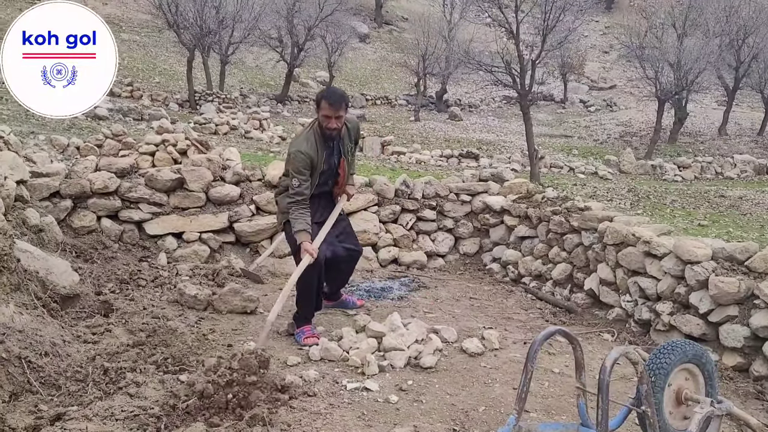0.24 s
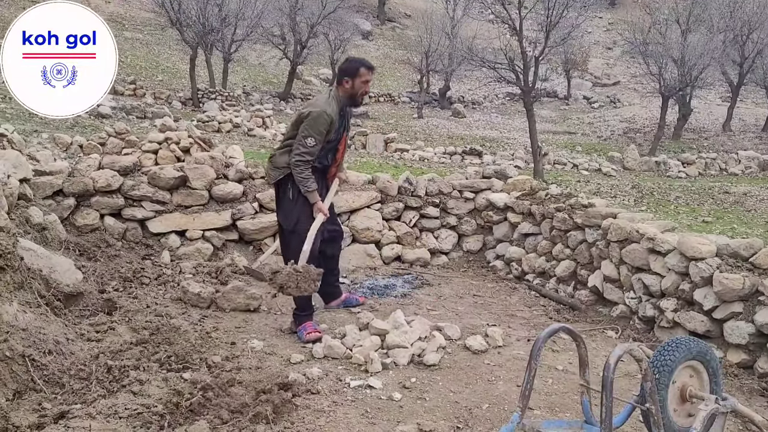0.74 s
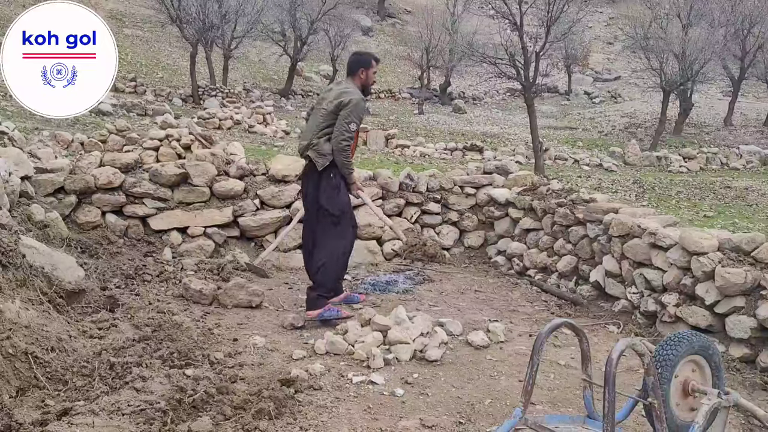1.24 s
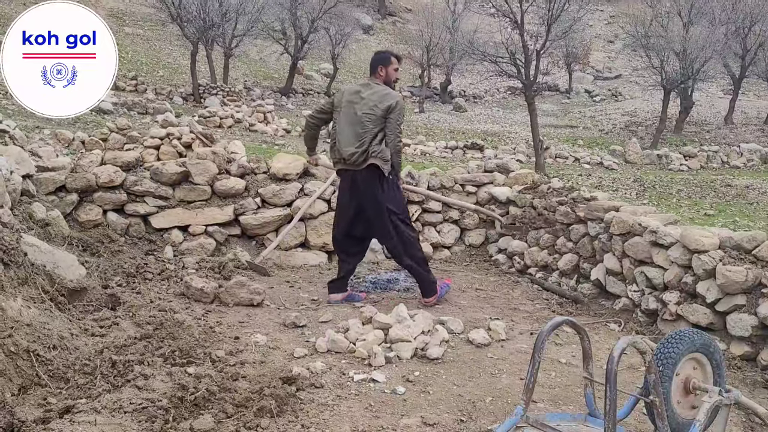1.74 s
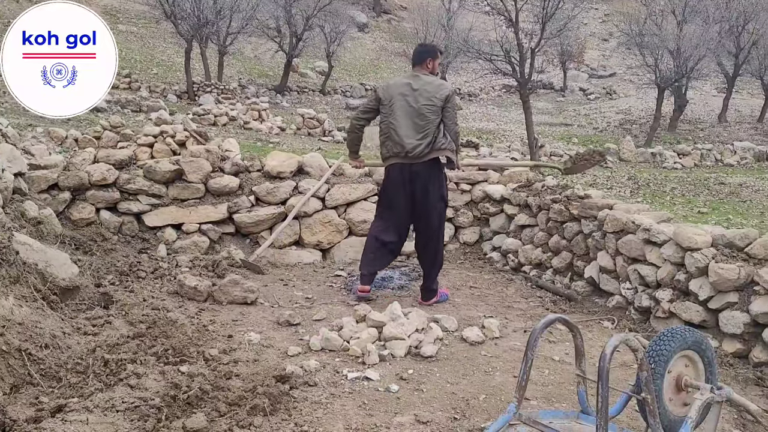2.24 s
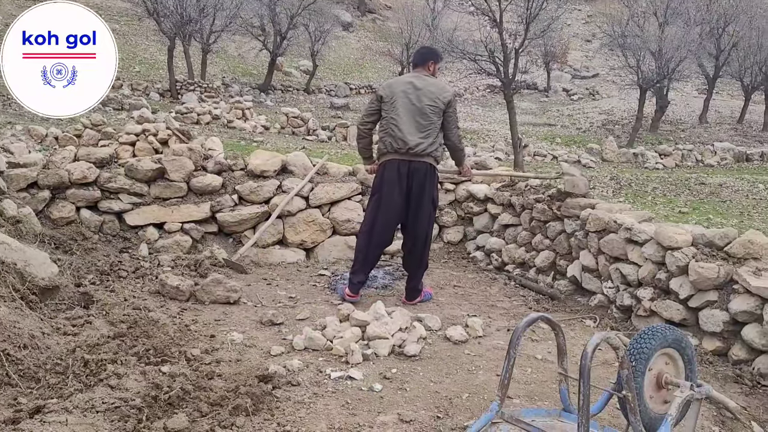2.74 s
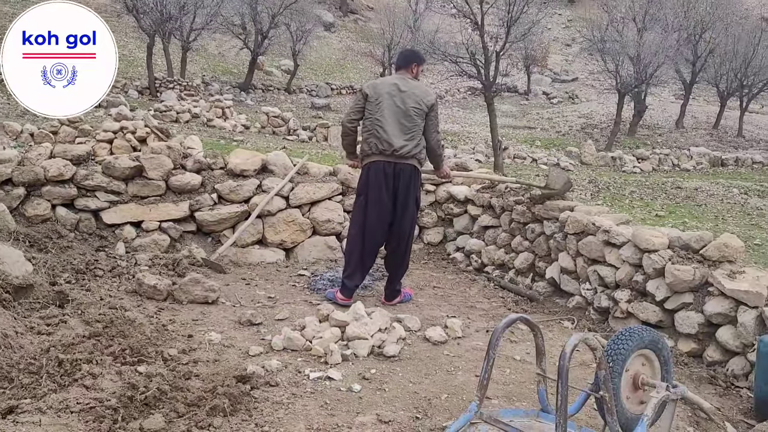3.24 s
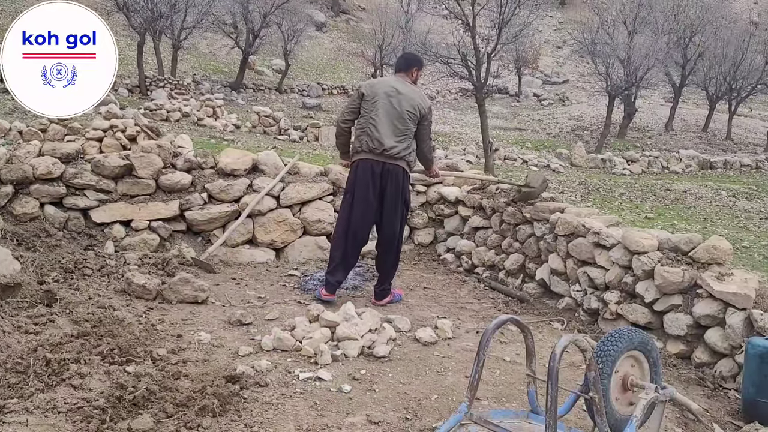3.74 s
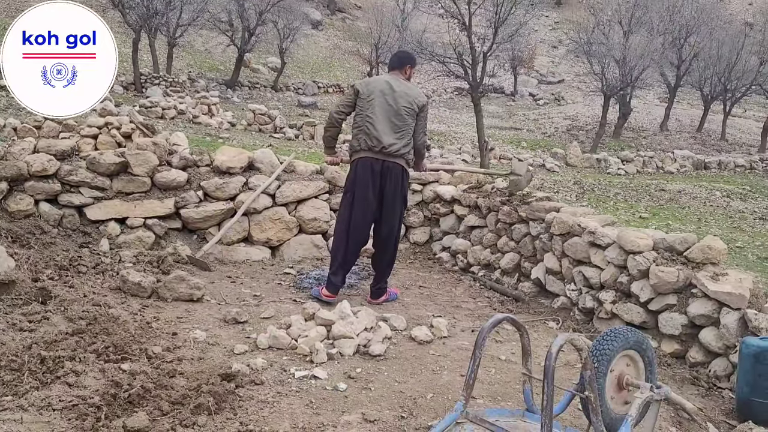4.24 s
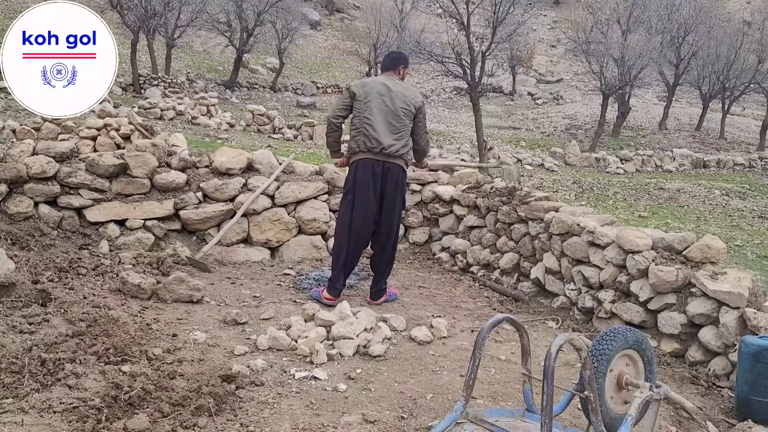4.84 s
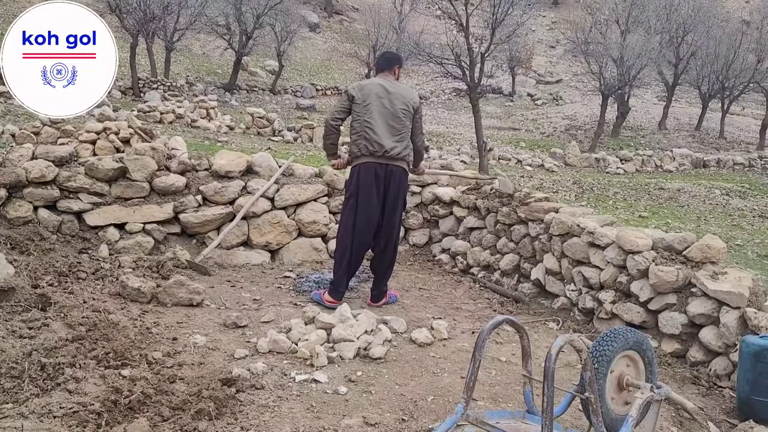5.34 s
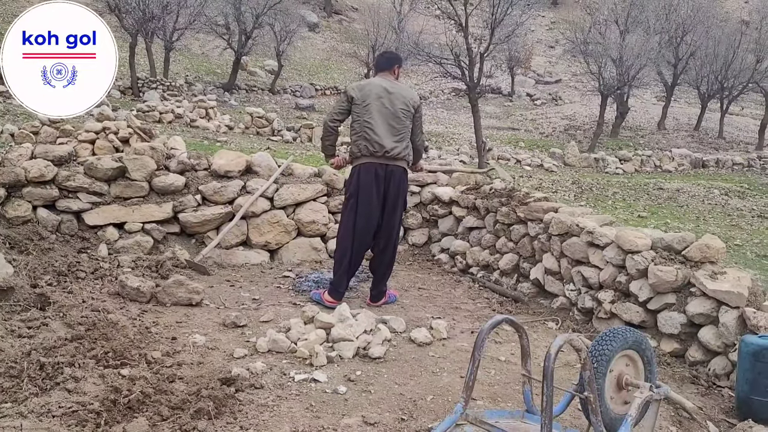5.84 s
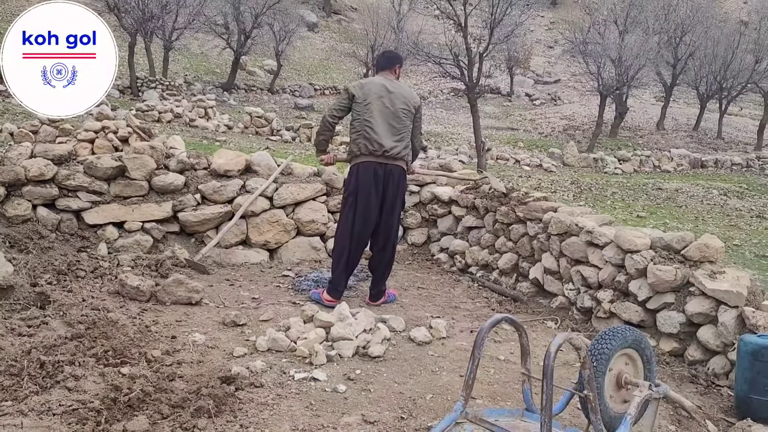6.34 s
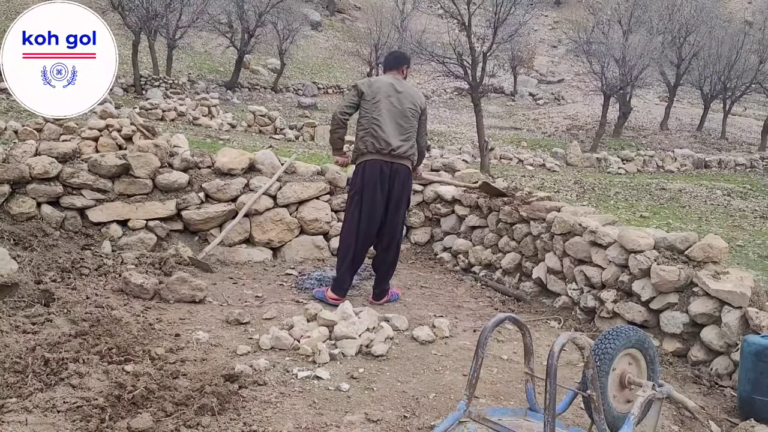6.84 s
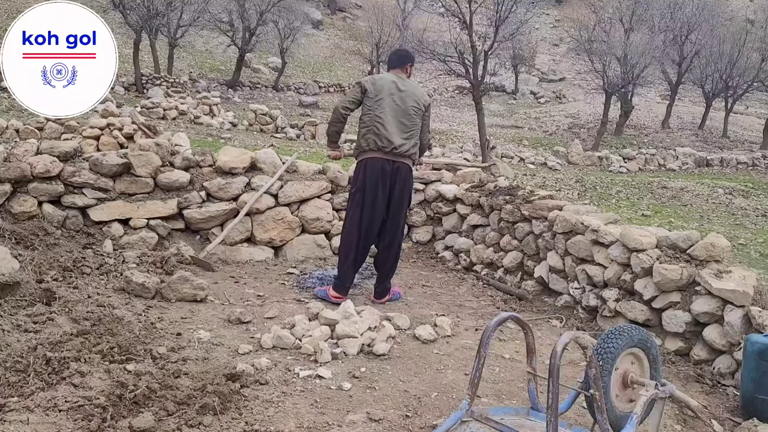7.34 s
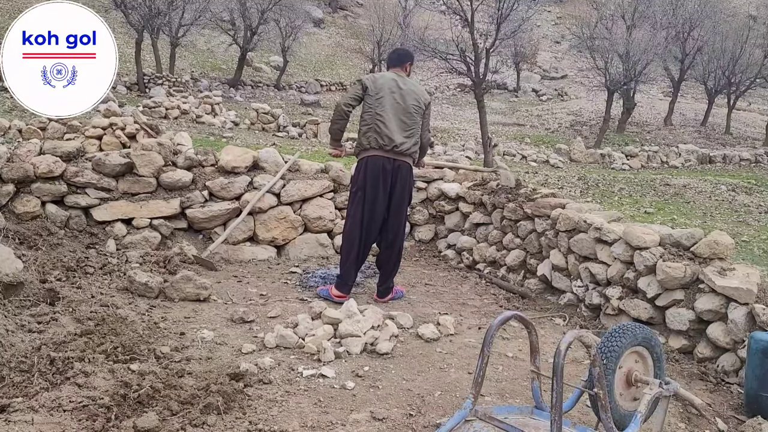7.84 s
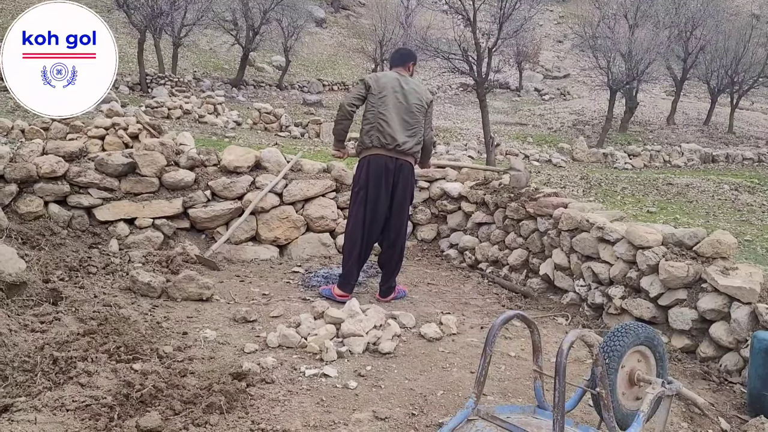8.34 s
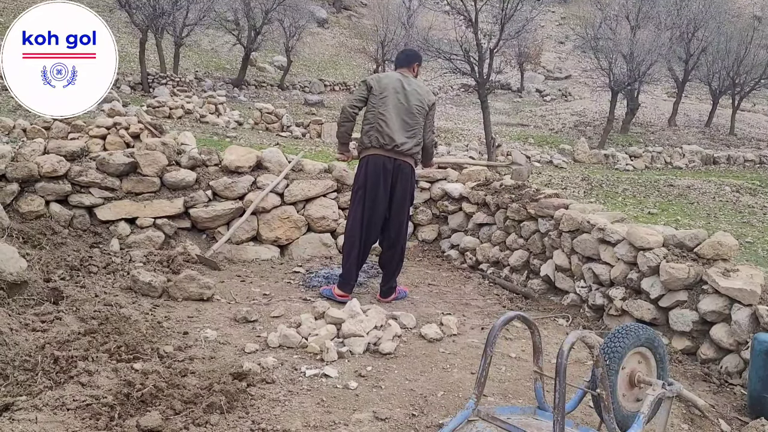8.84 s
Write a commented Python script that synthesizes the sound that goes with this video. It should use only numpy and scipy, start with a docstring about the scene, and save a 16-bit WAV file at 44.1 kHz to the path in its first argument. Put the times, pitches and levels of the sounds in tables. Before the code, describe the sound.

Shovel blade loaded with stony earth lands uneven gritty blows on a dry-stone wall, with ticking pebbles and faint birds in a quiet open valley.

```python
"""In a rough-walled yard on a slope above a valley, a steel shovel lifts stony earth and pats it on a dry-stone wall.
Each blow is crushed grit (noise bands that hold, then decay) plus the damped modes of blade and wooden shaft.
Pebbles tick as short noise bursts; sliding crumbs are grainy noise that grows and runs out.
Behind lie gliding bird calls and faint low tones, far swells and puffs of wind as shaped noise,
and a soft valley hum with one wandering resonance.
The yard adds a thin tail and an echo to the blows, pebbles, bird calls and low tones."""
import sys
import numpy as np
from scipy import signal
from scipy.fft import rfft, irfft
from scipy.io import wavfile

SR = 44100
rng = np.random.default_rng(int(sys.argv[2]) if len(sys.argv) > 2 else 0)


def wav_record(signal):
    """Record a signal, one row per channel, as 16-bit PCM in the file named by sys.argv[1]."""
    frames = np.transpose(np.atleast_2d(signal))
    bounded = np.clip(frames, -1, 1)
    # unit amplitude maps onto the largest positive 16-bit level
    quanta = np.round(bounded * 32767).astype(np.int16)
    wavfile.write(sys.argv[1], SR, quanta)


N = 400428
TIME = np.arange(N) / SR

# shovel blows: [t/s, strength level/dB; relative to it: weight of earth level/dB, scrape of the edge level/dB,
# crushed grit level/dB; time the earth takes to give way t/s, free ring of the blade level/dB,
# spilling crumbs level/dB (both relative to the crunch), pitch favoured by the point of contact f/Hz]
BLOWS = [(2.6326, -28.5, -11, -13, -16, 0.0075, -8, -9, 925),
         (3.4512, -35.5, -16.5, -11, -9.5, 0.014, -17, -19.5, 2900),
         (3.474, -49.5, -4, -3, -4, 0.0031, -2.5, -23, 2369),
         (3.5037, -50.5, -10, -5.5, -12, 0.013, -5, -7, 2600),
         (4.5461, -41.5, -6, -11, -6, 0.0086, -11, -15, 2350),
         (5.171, -21, -7, -1.5, -8, 0.0052, -5.5, -23, 1100),
         (5.683, -47.5, -2, -8.5, -7.5, 0.021, -11.5, -15, 475.9),
         (6.115, -60, -2.5, -10, -7, .014, -15, -10, 920),
         (6.805, -33.5, -0.5, -10.5, -9.5, 0.015, -10.5, -28, 763),
         (7.5071, -44.5, -5, -7, -9, .0072, -10.5, -33, 2190),
         (7.5696, -47, 0, -3.5, -3, 0.011, -8, -33, 257.2),
         (8.358, -73, 10.5, -17, -24, .003, -8.5, -29.5, 590),
         (8.4812, -17.5, -9, -17.5, -15.5, 0.012, -8, -33, 2060)]
# voices of a blow (ground thump, shaft thud, body, knock, clank, scrape, grit):
# [trim level/dB, 60 dB decay of the crunch t/s, share of the give time that it lasts]
BLOW_VOICES = [(-19, 0.074, 0.97), (-0.6, 0.26, 0.95), (-0.1, .085, 0.91), (-3, 0.087, 1), (-3.5, .075, .9),
               (-1, 0.066, 0.52), (-7.5, .065, .4)]
# frequency band of each of those voices: [lowest f/Hz, highest f/Hz]
BLOW_BANDS = [(35, 110), (175, 350), (350, 620), (620, 1350), (1350, 3200), (3200, 7000), (7000, 18000)]
# vibration modes of blade and shaft: [f/Hz, level/dB]
SHOVEL_MODES = [(226, 1), (266, 0), (315, -4), (418, 4), (530, -3), (619, -6), (775, -3), (822, -4),
                (936, 3), (1040, -4), (1115, -4), (1174, -1), (1456, -6), (1564, -7), (1714, 1), (1770, -5),
                (1878, -7), (1993, -2), (2157, 4), (2300, -6), (2432, 2), (2562, -1), (2700, -9),
                (3052, -6), (3330, -14), (3525, -7), (4168, -5), (4400, -7), (5850, -9), (6590, -7),
                (7310, -8)]
RING_T60_S = .078
CONTACT_DB, CONTACT_OCTAVES = 5.5, 0.54   # lift of the voices near the favoured pitch, and its reach

# small stones and crumbs landing: [t/s, knock of the stone level/dB, its grit level/dB, time spent crumbling t/s]
PEBBLES = [(.289, -70.5, -82, .002), (.551, -78, -72, .002), (.575, -69, -72, 0.00568),
           (1.226, -61.5, -80, 0.00317), (1.24, -84, -72, .002), (1.686, -64.5, -80.5, 0.0018),
           (1.936, -90, -77.5, .002), (2.174, -76, -71.5, 0.0018), (2.398, -76.5, -74.5, .002),
           (2.485, -77, -68.5, .002), (2.607, -63, -69.5, .002), (3.043, -63, -74.5, .002),
           (3.087, -73, -79, 0.0016), (3.1365, -55, -100, 0.0018), (3.67, -81.5, -76, .002),
           (3.703, -60.5, -66, 0.002747), (3.7305, -77, -62.5, .0015), (6.095, -78, -78, .019),
           (8.05, -81, -81, 0.045), (8.934, -74, -80.5, 0.015)]
# voices of a pebble (tap, knock, click, hiss): [trim level/dB, share that follows the grit rather than the knock]
PEBBLE_VOICES = [(4, 0.18), (-1, 0.17), (-3.5, 0.65), (-1, 1)]
# successive limits of the four pebble bands: [f/Hz]
PEBBLE_EDGES = [400, 1100, 2000, 6000, 16500]
PEBBLE_T60_S = 0.059

# loads of loose earth sliding on the blade:
# [fastest flow t/s, build-up t/s, die-away t/s, coarse crumbs level/dB, fine soil level/dB]
SLIDES = [(.32, 0.11, 0.27, -85, -83), (.59, 0.075, 0.12, -76, -72.5), (1.17, .07, 0.089, -82.5, -87.5),
          (1.83, 0.1249, 0.28, -83, -83.5), (2.46, 0.079, .11, -81.5, -75.5),
          (3.26, 0.12, 0.15, -79.5, -79.5), (3.44, 0.11, 0.14, -72.5, -78), (3.53, .015, 0.03, -60, -66),
          (3.73, .04, 0.053, -72, -74), (4.35, .08, .1, -87.5, -84.5), (4.62, 0.1, 0.03488, -71.5, -74.5),
          (5.28, 0.04152, 0.26, -80, -82.5), (5.64, .05, 0.087, -80, -84), (6.85, 0.019, 0.052, -80, -77),
          (8.56, 0.039, 0.04, -66, -76)]
SCRATCH_DB = -10   # scratch of a slide, relative to the mean of its crumbs and soil
# noise spectra of the coarse crumbs, the scratch and the fine soil: [f/Hz, relative level per Hz/dB]
RASP_SPECTRUM = [(1400, -17.5), (2100, 5.5), (2500, 0.5), (3100, -5), (3500, -7.5), (4500, -25)]
SCRATCH_SPECTRUM = [(2500, -18), (3700, -1), (4500, 0), (5600, -2), (7000, -20.5)]
HISS_SPECTRUM = [(3500, -33), (5500, -4.5), (7000, 3), (9500, -4.5), (12500, 1.5), (16000, -2.5)]

# the two microphone ports: [f/Hz, left lead/rad, left minus right level/dB]
PORTS = [(100, 0, -.8), (500, -.25, -2.5), (850, -.35, 1), (1300, -1.2, -3.5), (2400, -1.2, -2.5),
         (3500, -.9, -2), (5500, -1.4, 5), (6500, -3.8, 4), (7500, -5.6, 1), (10000, -6.6, 4),
         (12500, -7.8, -4), (16000, -8, 0)]
# how alike far sound is at left and right: [f/Hz, likeness]
LIKENESS = [(30, .3), (80, 0.8), (160, .93), (400, 0.26), (900, 0.59), (1500, 0.019), (16000, 0.12)]
ECHO_S = .071

# shapes of far bird calls (rising chirp, level pip, slow rising slur, falling scold, thin high tsip):
# [length t/s, first f/Hz, last f/Hz, waver as a share of f]
CHIRP = (.048, 3550, 4200, .1)
PIP = (.085, 3580, 3595, .002)
SLUR = (.28, 2530, 3260, 0.0037)
SCOLD = (.058, 3600, 2500, 0.17)
TSIP = (.04, 6100, 6300, 0.042)
# when each call is heard: [t/s, level before trim/dB]
CHIRP_CALLS = [(.19, -80), (.31, -73), (1.1, -84), (1.78, -72), (4.16, -75.5), (4.31, -74.5), (4.44, -81)]
PIP_CALLS = [(1.52, -83), (2.0, -88), (2.465, -76), (4.18, -85.5), (4.67, -85.5)]
SLUR_CALLS = [(3.82, -81), (4.37, -85), (5.3, -81)]
SCOLD_CALLS = [(1.47, -66.5), (3.76, -66)]
TSIP_CALLS = [(1.47, -78), (2.09, -76), (2.35, -77)]
# faint low tones that slide down:
# [t/s, length t/s, first f/Hz, last f/Hz, level before trim/dB, waver as a share of f]
LOW_TONES = [(.545, 0.06, 356, 304, -46, 0.01), (5.26, .22, 405, 252.3, -47.5, .01)]

# far sounds that swell and fade: [t/s, half length t/s, level/dB, lowest f/Hz, highest f/Hz]
SWELLS = [(0.796, 0.34, -76, 1300, 1680), (1.723, .17, -74.5, 1397, 1720), (3.677, .04, -61, 583, 663),
          (4.403, 0.047, -63.5, 536, 617), (4.77, 0.046, -67, 602, 703), (8.92, 0.16, -72, 1640, 2450)]
# puffs of wind on the microphone: [t/s, half length t/s, level/dB, left minus right level/dB]
WIND = [(0.79, 0.018, -61, 10), (0.893, 0.035, -53, 18), (0.96, 0.02664, -64, 8), (1.579, 0.035, -57, 8.5),
        (2.063, 0.0338, -56, 12), (2.56, 0.026, -57.5, -1), (2.665, 0.039, -55, -1.5),
        (7.254, 0.11, -61.5, -17), (7.712, 0.02438, -46, -17), (7.813, 0.038, -44.5, -14),
        (7.92, 0.021, -52.5, -12)]
# noise spectrum of a puff: [f/Hz, relative level per Hz/dB]
PUFF_SPECTRUM = [(20, -15.5), (45, 0), (65, 1), (100, -12.5), (160, -15), (300, -35)]

# the valley: [t/s, hum level before trim/dB, narrow resonance level/dB]
VALLEY = [(0.0, -62, -66.5), (0.7, -59, -68), (1.59, -62, -78.5), (2.27, -61.5, -70.5), (2.98, -62.5, -83),
          (3.29, -62, -69.5), (3.59, -59, -69.5), (4.05, -63.5, -78.5), (4.37, -59.5, -72.5),
          (5.06, -60, -77), (5.28, -59, -71), (5.59, -62, -74), (6.7, -62, -72.5), (7.46, -61.5, -77),
          (7.74, -60, -65), (7.96, -62.5, -72), (8.9, -61.5, -81.5), (9.08, -60.5, -78)]
# pitch of the narrow upper resonance of the hum: [t/s, f/Hz]
HUM_PEAK = [(0, 995.6), (2.5, 1014), (3.5, 1064), (4.5, 1085), (5.5, 1045), (7, 1058), (9.08, 1021)]
# noise spectra of the hum, the airy edge above it and the faint hiss: [f/Hz, relative level per Hz/dB]
HUM_SPECTRUM = [(15, -50.5), (25, -20.5), (48, -9.5), (97, -6.5), (213, -1.5), (321, -1), (356, -3.5),
                (694, -16), (913, -17.5), (994, -11.5), (1240, -33), (1500, -35.5), (1950, -64),
                (3300, -120)]
EDGE_SPECTRUM = [(900, -20.5), (1250, 0.5), (1580, 0), (1950, -7.5), (2600, -12.5)]
AIR_SPECTRUM = [(1500, -6.5), (2200, 4), (3200, -.5), (4500, -2), (7000, -3.5), (10000, -2.5), (13000, -1),
                (16000, -1.5)]
EDGE_DB, AIR_DB = -85.5, -87   # steady levels of the airy edge and the hiss

CUTOFF_HZ = 16100


def blows(crack_db=6.0, crack_s=0.0015, rise_s=0.0004, spill_t60=0.057, clump_db=2.5):
    """Impact excitation: a crack on stone, crushed earth and ringing modes, with crumbs spilling in clumps."""
    out = np.zeros((2, N))
    t = np.arange(SR // 4) / SR
    onset = 1 - np.exp(-t / rise_s)
    crack = 1 + from_db(crack_db) * np.exp(-t / crack_s)
    for s, strength_db, weight_db, scrape_db, grit_db, give_s, ring_db, spill_db, favoured_hz in BLOWS:
        levels = strength_db + voice_levels(weight_db, scrape_db, grit_db, favoured_hz)
        ring = from_db(ring_db) * shovel_ring(t, give_s, favoured_hz)
        clumps = from_db(spill_db + clump_db * drift(150, size=len(t)))
        spill = clumps * crunch(t, give_s, spill_t60, grain_db=5.5)
        for level_db, (low_hz, high_hz), (trim_db, t60, share) in zip(levels, BLOW_BANDS, BLOW_VOICES):
            crushed = crack * crunch(t, share * give_s, t60) + spill
            contact = onset * (ring + struck_stone(crushed, favoured_hz))
            add(out, s, voiced(contact, low_hz, high_hz, level_db + trim_db))
    return out


def voice_levels(weight_db, scrape_db, grit_db, favoured_hz):
    """Spectral balance: earth feeds three low voices, edge and grit the top two; contact lifts its own pitch."""
    centre_hz = np.sqrt(np.prod(BLOW_BANDS, axis=1))
    lift_db = CONTACT_DB * np.exp(-(np.log2(centre_hz / favoured_hz) / CONTACT_OCTAVES) ** 2)
    return lift_db + np.array([weight_db, weight_db, weight_db, 0, 0, scrape_db, grit_db])


def shovel_ring(t, give_s, favoured_hz, favour_db=8.0, reach_octaves=0.55, scatter_db=2.5):
    """Modal excitation: the point of contact brings out modes near one pitch; earth damps them all alike."""
    hz, level_db = np.transpose(SHOVEL_MODES)[:, :, None]
    strength, phase_turns = rng.standard_normal((2, len(SHOVEL_MODES), 1))
    favour = np.exp(-(np.log2(hz / favoured_hz) / reach_octaves) ** 2)
    level_db = level_db + scatter_db * strength + favour_db * favour
    modes = from_db(level_db) * np.sin(2 * np.pi * (hz * t + phase_turns))
    damping_db = -60 * np.maximum(t - give_s / 2, 0) / RING_T60_S
    return modes.sum(axis=0) * from_db(damping_db)


def crunch(t, give_s, t60, grain_db=1.0, spread=0.39):
    """Fracture noise: grit breaks in dense uneven snaps while the earth gives way, then dies out."""
    # one part common to both ports, one part independent at each
    snaps = rng.standard_normal(len(t)) + spread * rng.standard_normal((2, len(t)))
    decay_db = -60 * np.maximum(t - give_s, 0) / t60
    return snaps * from_db(grain_db * drift(1800, size=len(t)) + decay_db)


def struck_stone(x, stone_hz, stone_db=4.5, half_width_octaves=.17):
    """Damped resonance: the stone under the blade adds one broad, dead resonance to the crunch."""
    width = 2 ** half_width_octaves
    return x + from_db(stone_db) * band(x, stone_hz / width, stone_hz * width, order=1)


def pebbles():
    """Small impacts: stones tick without ringing the blade, a knock below and grit above."""
    out = np.zeros((2, N))
    t = np.arange(SR // 8) / SR
    for s, knock_db, grit_db, give_s in PEBBLES:
        for (trim_db, share), low_hz, high_hz in zip(PEBBLE_VOICES, PEBBLE_EDGES, PEBBLE_EDGES[1:]):
            level_db = trim_db + knock_db + share * (grit_db - knock_db)
            add(out, s, voiced(crunch(t, give_s, PEBBLE_T60_S), low_hz, high_hz, level_db))
    return out


def voiced(x, low_hz, high_hz, level_db):
    """Band-limited radiation: one band of a contact, with this level over its first 20 ms."""
    x = band(at_ports(x), low_hz, high_hz)
    return from_db(level_db) * x / rms(x.mean(axis=0)[:SR // 50])


def at_ports(x):
    """Interaural-like difference: sound reaches the two ports with a lag and a shadow that depend on pitch."""
    size = x.shape[-1]
    hz = np.arange(size + 1) * SR / (2 * size)
    # half of the difference goes to the left, its inverse to the right
    half = np.exp(.5j * at_hz(PORTS, hz)) * from_db(at_hz(PORTS, hz, axis=2) / 2)
    return irfft(rfft(x, 2 * size) * np.array([half, 1 / half]))[:, :size]


def sliding_earth(grain_db=3.5, clump_db=1.95):
    """Friction noise: crumbs rub over steel and stone in small clumps; each slide gathers pace and runs out."""
    rasp = scratch = hiss = 0
    for s, build_s, die_s, coarse_db, fine_db in SLIDES:
        steepness = np.maximum((s - TIME) / build_s, (TIME - s) / die_s)
        flow = np.exp(-np.minimum(steepness, 20))
        scratch_db = (coarse_db + fine_db) / 2 + SCRATCH_DB
        # overlapping slides add in power
        rasp = np.hypot(rasp, flow * from_db(coarse_db))
        scratch = np.hypot(scratch, flow * from_db(scratch_db))
        hiss = np.hypot(hiss, flow * from_db(fine_db))
    grains = from_db(grain_db * drift(830) + clump_db * drift(34))
    crumbs = rasp * air_noise(RASP_SPECTRUM)
    scratches = scratch * air_noise(SCRATCH_SPECTRUM)
    soil = hiss * air_noise(HISS_SPECTRUM)
    return grains * (crumbs + scratches + soil)


def yard(x, tail_db=-32.5, t60=0.48, treble_t60=0.44, treble_db=0.0, echo_db=-38.0, echo_spread_s=0.0053):
    """Scattering: rough walls and the slope return a thin, blurred tail and one smeared echo."""
    t = np.arange(SR) / SR
    low, high, slap = rng.standard_normal((3, 2, SR))
    low_tail = band(low, 200, 4000, order=2) * from_db(-60 * t / t60)
    treble_tail = band(high, 4000, 9000, order=2) * from_db(treble_db - 60 * t / treble_t60)
    tail = low_tail + treble_tail
    echo = band(slap, 600, 8700, order=1) * (t > ECHO_S) * np.exp(-np.abs(t - ECHO_S) / echo_spread_s)
    response = from_db(tail_db) * tail / rms(tail) + from_db(echo_db) * echo / rms(echo)
    response = response / np.sqrt(SR)
    # a random modulation blurs the ringing lines, so that the tail is rough rather than tonal
    blurred = x * np.sqrt(2) * np.sin(2.2 * drift(650))
    return x + signal.fftconvolve(blurred, response, axes=1)[:, :N]


def birds():
    """Frequency-modulated whistles: each kind of call repeats with the same glide, louder or softer."""
    kinds = [(CHIRP, CHIRP_CALLS), (PIP, PIP_CALLS), (SLUR, SLUR_CALLS), (SCOLD, SCOLD_CALLS),
             (TSIP, TSIP_CALLS)]
    notes = []
    for (length_s, first_hz, last_hz, waver), calls in kinds:
        for s, level_db in calls:
            notes.append((s, length_s, first_hz, last_hz, level_db, waver))
    return whistles(notes, trim_db=-3.5, waver_rate=1000, flutter_db=5.0)


def low_tones():
    """Gliding tones: faint low notes slide down with a slower waver than the birds."""
    return whistles(LOW_TONES, trim_db=2.0, waver_rate=52, flutter_db=3.5)


def whistles(notes, trim_db, waver_rate, flutter_db):
    """Phase integration: near-pure notes glide fast, then level off; distance makes them flutter."""
    out = np.zeros((2, N))
    for s, length_s, first_hz, last_hz, level_db, waver in notes:
        u = np.linspace(0, 1, int(length_s * SR))
        glide_hz = last_hz + (first_hz - last_hz) * (1 - u) ** 2
        hz = glide_hz * (1 + waver * drift(waver_rate, size=len(u)))
        flutter = flutter_db * drift(110, size=len(u))
        gain = from_db(level_db + trim_db + flutter) * np.sin(np.pi * u)
        add(out, s, gain * np.sin(2 * np.pi * np.cumsum(hz) / SR))
    return out


def far_swells():
    """Amplitude envelopes: narrow bands of far sound come and go."""
    out = np.zeros((2, N))
    air = air_noise(EDGE_SPECTRUM)
    for s, half_s, level_db, low_hz, high_hz in SWELLS:
        sound = band(air, low_hz, high_hz, order=2)
        out += from_db(level_db) * swell(s, half_s) * sound / rms(sound.mean(axis=0))
    return out


def wind():
    """Turbulent pressure noise: low puffs swell and fade, each stronger on one port."""
    gain = np.zeros((2, N))
    for s, half_s, level_db, pan_db in WIND:
        port_db = level_db + np.array([[pan_db], [-pan_db]]) / 2
        gain += from_db(port_db) * swell(s, half_s)
    return gain * air_noise(PUFF_SPECTRUM)


def valley(hum_trim_db=2.0, width_hz=45, waver_db=1.5):
    """Filtered noise: a far, even hum and a narrow resonance that wanders and wavers, under a faint hiss."""
    hum_db, peak_db = in_time(VALLEY)
    centre_hz, = in_time(HUM_PEAK)
    # slow noise multiplied by a sine gives a narrow band around the sine
    wobble = air_noise([(1, 0), (width_hz, -3), (4 * width_hz, -20)])
    peak = np.sqrt(2) * wobble * np.sin(2 * np.pi * np.cumsum(centre_hz) / SR)
    resonance = from_db(peak_db + waver_db * drift(4.3)) * peak
    hum = from_db(hum_db + hum_trim_db) * air_noise(HUM_SPECTRUM)
    air = from_db(EDGE_DB) * air_noise(EDGE_SPECTRUM) + from_db(AIR_DB) * air_noise(AIR_SPECTRUM)
    return hum + resonance + air


def air_noise(spectrum):
    """Partial coherence: diffuse stereo noise of this spectrum, whose left-right mean has rms 1."""
    hz = np.arange(N // 2 + 1) * SR / N
    # the spectrum falls away above its last point
    gain = from_db(at_hz(spectrum, hz)) / (1 + (hz / spectrum[-1][0] / 1.2) ** 12)
    alike = np.clip(at_hz(LIKENESS, hz), -1, 1)
    mid_side = rfft(rng.standard_normal((2, N))) * gain * np.sqrt([1 + alike, 1 - alike])
    mid, side = irfft(mid_side, N)
    return np.array([mid + side, mid - side]) / rms(mid)


def swell(s, half_s):
    """Envelope: a flat-topped rise and fall around time s, at half height half_s away."""
    return 1 / (1 + ((TIME - s) / half_s) ** 4)


def drift(rate, size=N):
    """Random modulation: straight lines between normal random values, this many values a second."""
    return np.interp(np.arange(size) / SR * min(rate, SR / 2), np.arange(size), rng.standard_normal(size))


def band(x, low_hz, high_hz, order=4):
    """Linear filtering: a causal Butterworth band-pass."""
    edges_hz = [low_hz, min(high_hz, SR / 2 - 1000)]
    return signal.sosfilt(signal.butter(order, edges_hz, "band", fs=SR, output="sos"), x)


def from_db(db):
    """Logarithmic level: decibels to amplitude gain."""
    return 10 ** (np.asarray(db) / 20)


def rms(x):
    """Effective value: root mean square, kept above zero."""
    return np.sqrt(np.mean(x ** 2) + 1e-20)


def in_time(rows):
    """Linear interpolation: each column of a time table at every sample."""
    s, *columns = np.transpose(rows)
    return [np.interp(TIME, s, column) for column in columns]


def at_hz(points, hz, axis=1):
    """Logarithmic pitch scale: one column of a spectrum table, read on a log-frequency axis."""
    points = np.array(points)
    return np.interp(np.log(hz + 1), np.log(points[:, 0]), points[:, axis])


def add(out, s, sound):
    """Superposition: mix a short sound in at time s."""
    at = max(round(s * SR), 0)
    out[:, at:at + sound.shape[-1]] += sound[..., :N - at]


def scene():
    """Superposition: blows, pebbles, calls and low tones sound in the yard; slides and background join them."""
    in_yard = blows() + pebbles() + birds() + low_tones()
    return yard(in_yard) + sliding_earth() + far_swells() + wind() + valley()


def record(dry):
    """Saturation and low-pass filtering: the highest peaks are rounded and the top is cut."""
    rounded = 1.2 * np.tanh(dry / 1.2)
    return signal.sosfilt(signal.ellip(10, .1, 70, CUTOFF_HZ, fs=SR, output="sos"), rounded)


dry = scene()
out = record(dry)
wav_record(out)
```